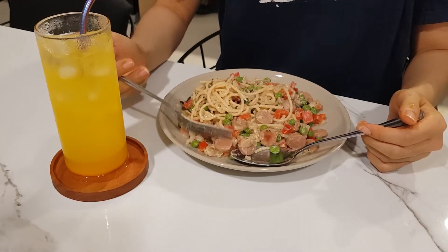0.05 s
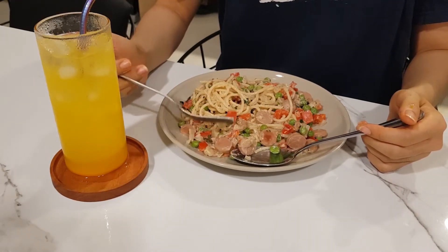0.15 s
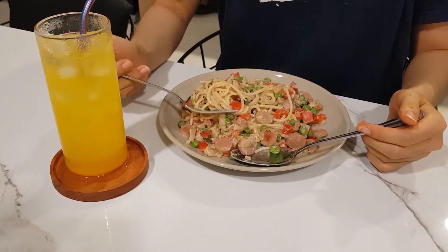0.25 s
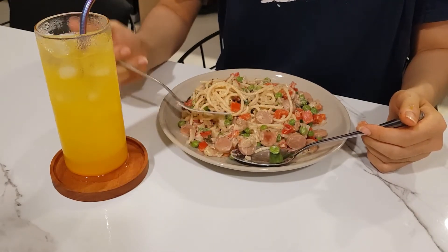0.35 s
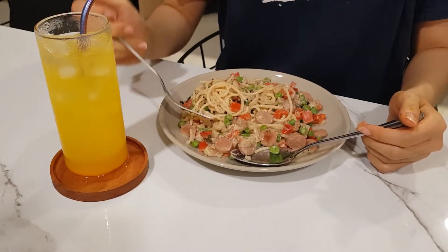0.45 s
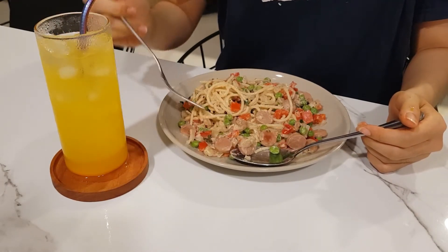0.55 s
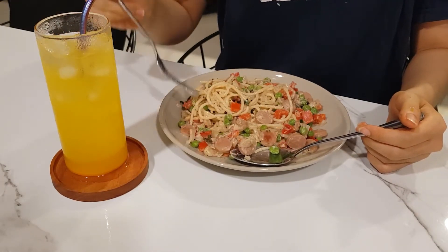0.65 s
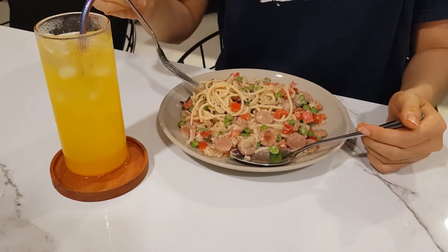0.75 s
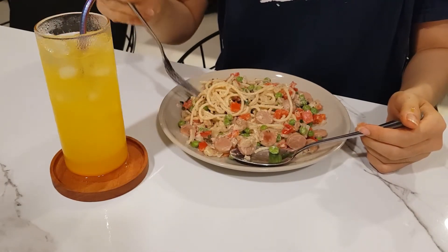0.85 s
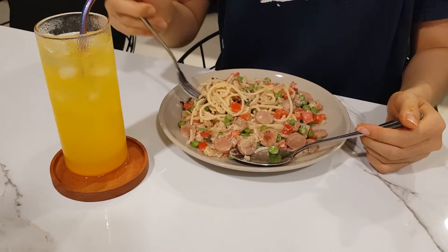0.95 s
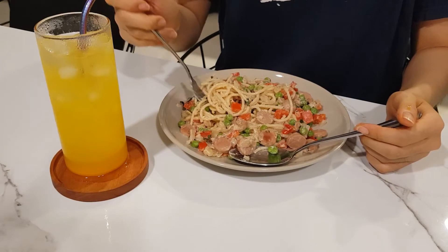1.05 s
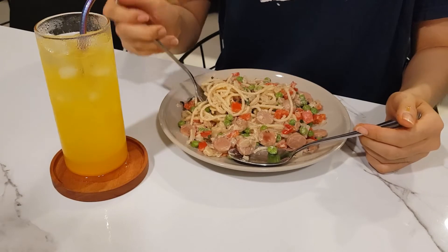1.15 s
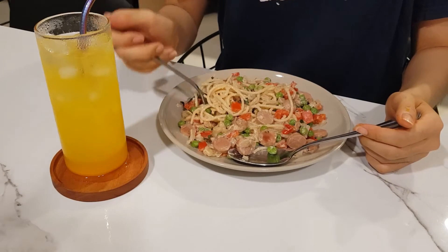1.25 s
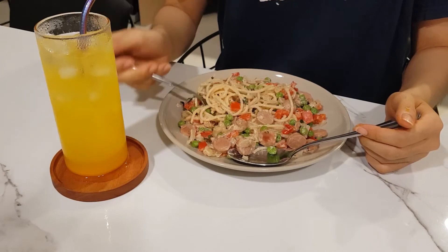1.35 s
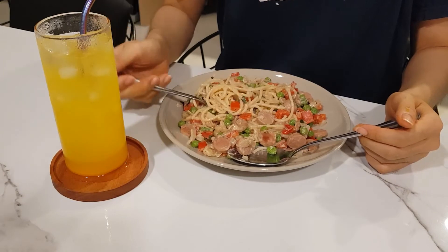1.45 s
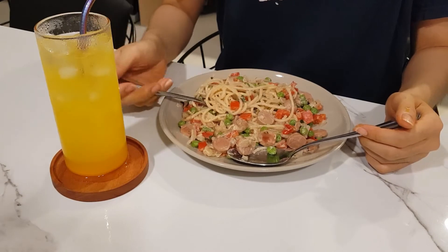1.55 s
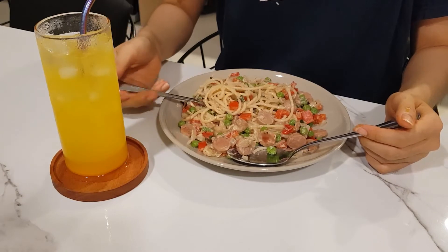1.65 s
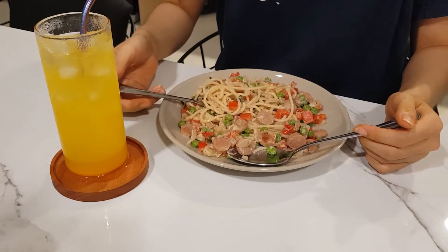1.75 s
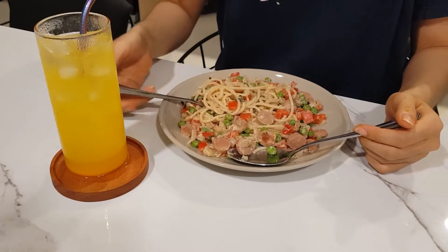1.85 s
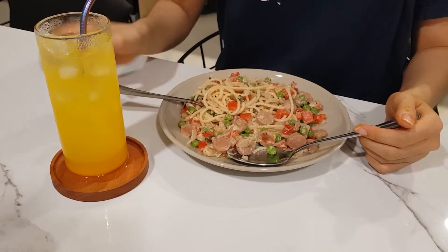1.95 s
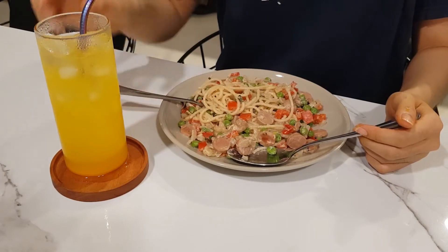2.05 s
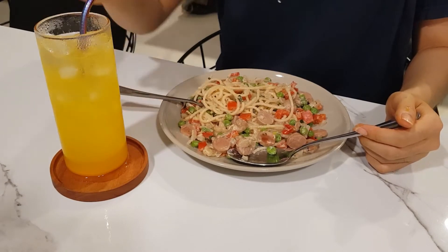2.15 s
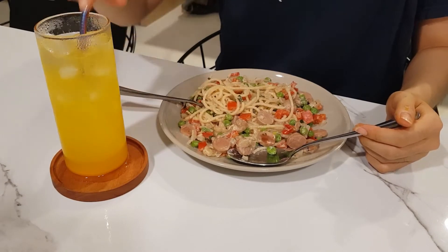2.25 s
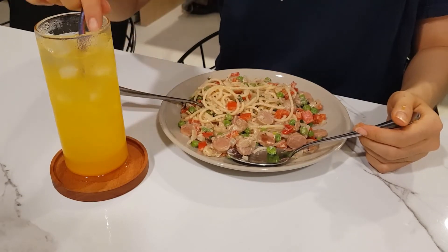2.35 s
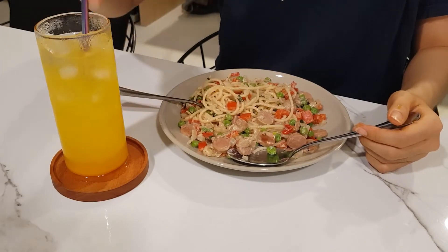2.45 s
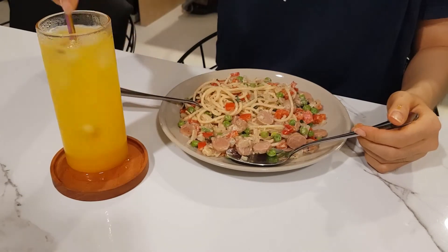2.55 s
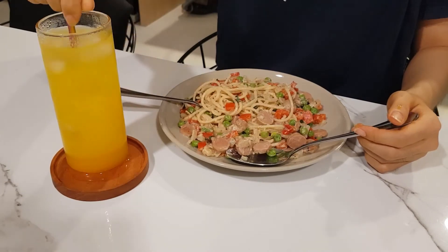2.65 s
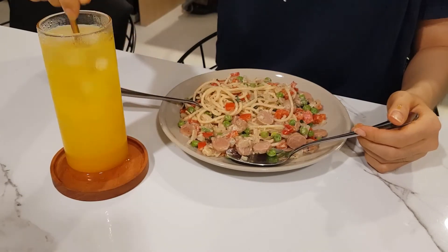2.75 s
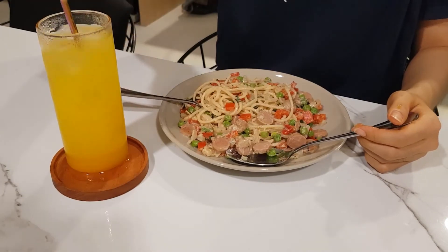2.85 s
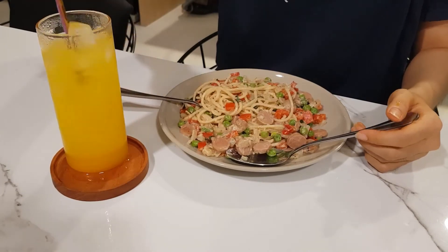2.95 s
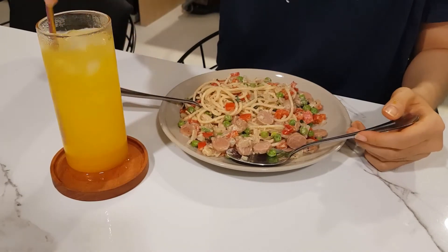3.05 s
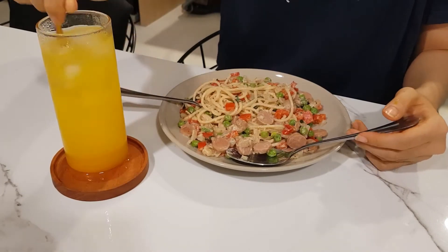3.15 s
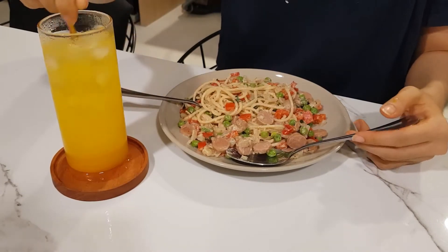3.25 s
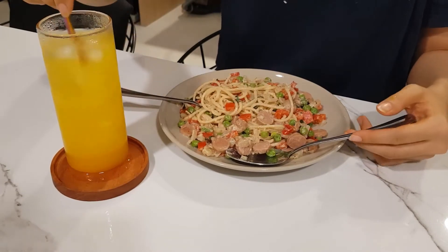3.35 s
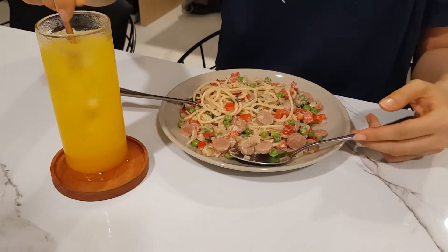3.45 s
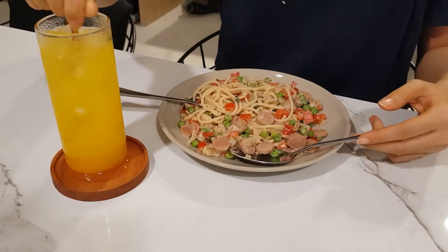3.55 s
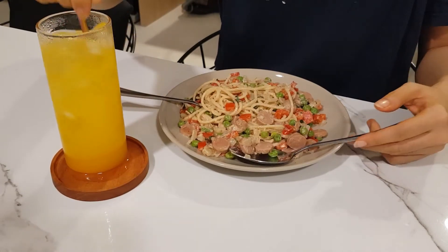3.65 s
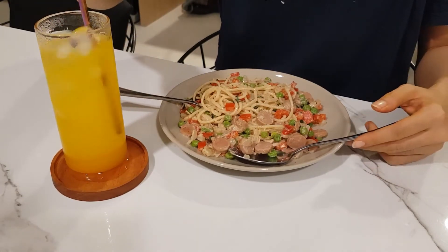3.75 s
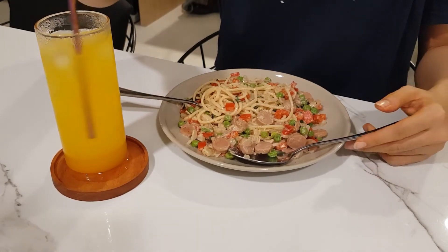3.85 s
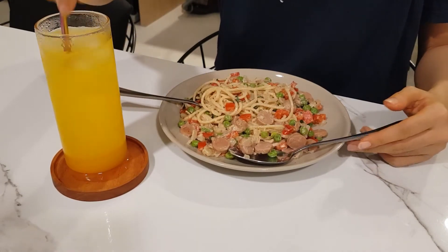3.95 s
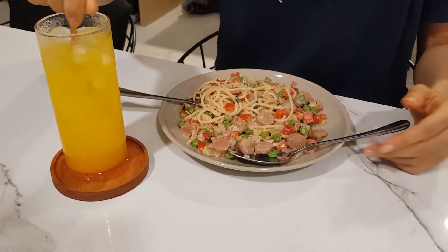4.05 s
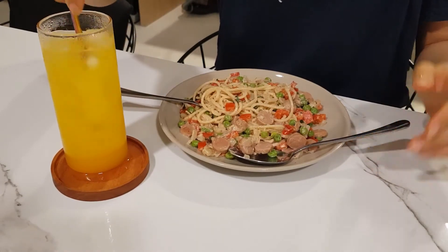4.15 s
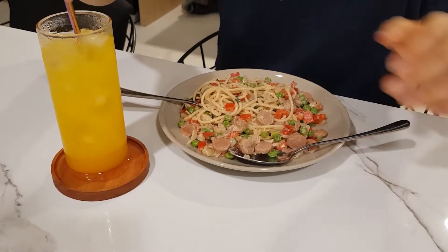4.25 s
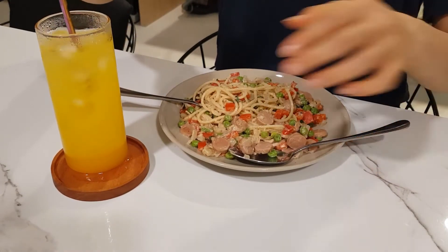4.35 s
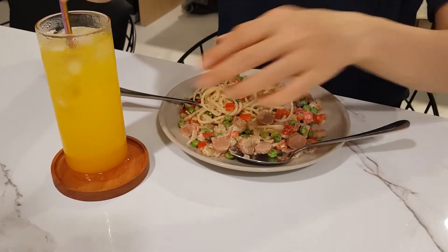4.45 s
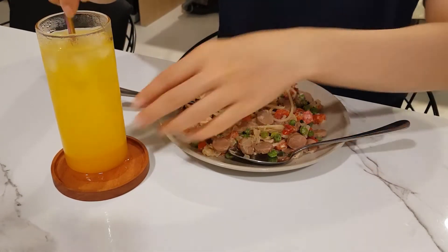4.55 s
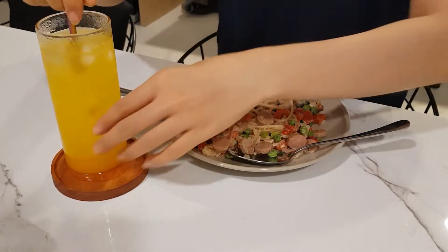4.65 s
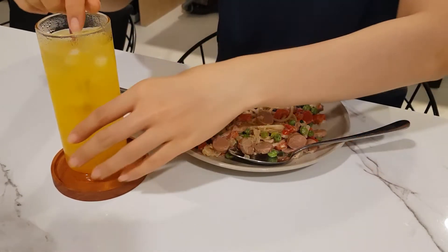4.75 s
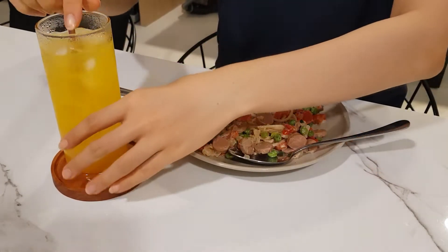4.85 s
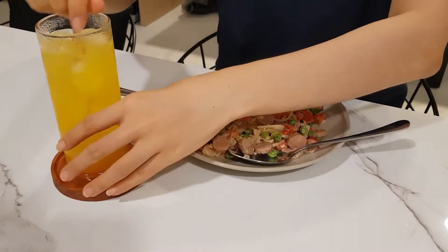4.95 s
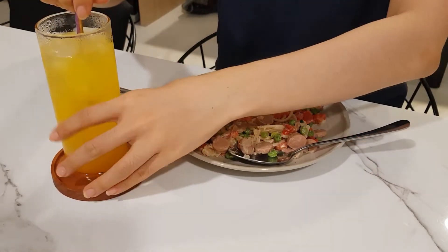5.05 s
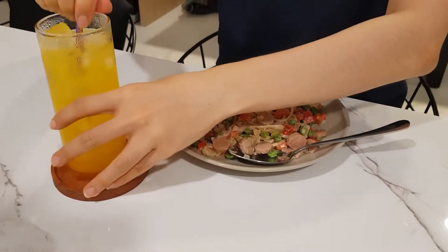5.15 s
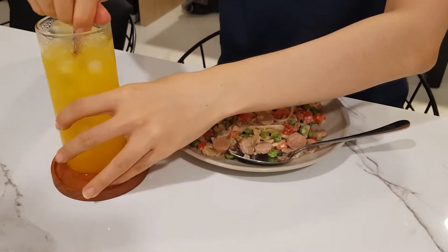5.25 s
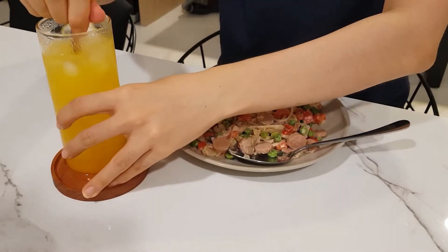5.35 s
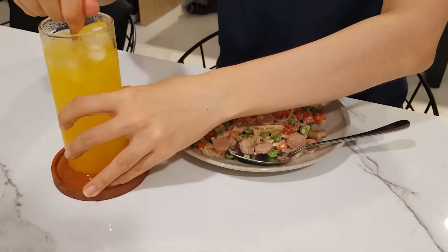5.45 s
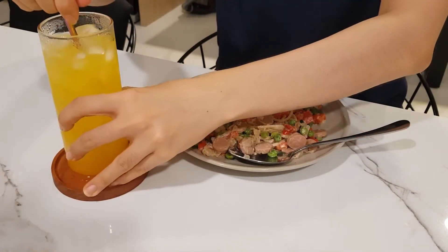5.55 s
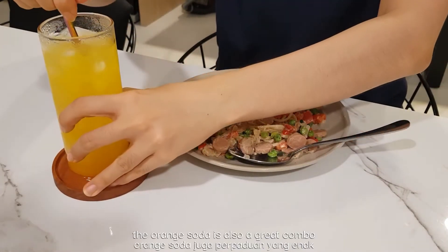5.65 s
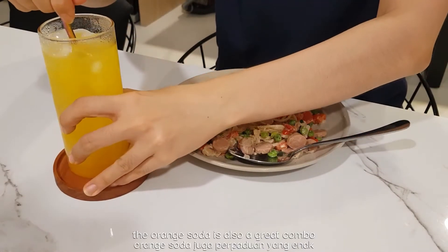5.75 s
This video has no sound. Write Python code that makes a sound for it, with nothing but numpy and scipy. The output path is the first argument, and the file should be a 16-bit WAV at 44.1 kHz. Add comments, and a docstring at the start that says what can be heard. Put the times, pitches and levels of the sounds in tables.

```python
"""At a table in a quiet room with a faint high whine, a stereo pair of microphones close to a tall glass.
A fork turns in noodles and touches a plate softly; then a metal straw stirs ice cubes in the glass of soda.
The cubes tick, grind and drag against the wall, whose ring the drink damps. The drink sloshes,
a few bubbles plink, and the straw knocks hard on the glass, which stands a little to the left."""
import sys
import numpy as np
from scipy import signal
from scipy.fft import rfft, irfft
from scipy.io import wavfile
from scipy.ndimage import uniform_filter1d

SR = 44100
rng = np.random.default_rng(int(sys.argv[2]) if len(sys.argv) > 2 else 0)


def wav_record(signal):
    """Record a signal, one row per channel, as 16-bit PCM in the file named by sys.argv[1]."""
    frames = np.transpose(np.atleast_2d(signal))
    bounded = np.clip(frames, -1, 1)
    # unit amplitude maps onto the largest positive 16-bit level
    quanta = np.round(bounded * 32767).astype(np.int16)
    wavfile.write(sys.argv[1], SR, quanta)


N = 255339


def amp(db):
    """Decibels to gain."""
    return 10 ** (np.asarray(db) / 20)


def unit_rms(x):
    """Scales to rms 1."""
    return x / np.sqrt(np.mean(x ** 2) + 1e-20)


def curve_at(points, hz):
    """Joins (Hz, value) points on a log-frequency axis."""
    f, value = np.transpose(points)
    return np.interp(np.log(hz + 1), np.log(f + 1), value)


def add(mix, s, sound):
    """Mixes a stereo sound in at time s."""
    part = mix[:, round(s * SR):][:, :sound.shape[1]]
    part += sound[:, :part.shape[1]]


def colour(x, spectrum, size=2048):
    """Minimum-phase filter of unit energy with the given spectrum."""
    hz = abs(np.fft.fftfreq(size, 1 / SR))
    log_gain = np.log(amp(curve_at(spectrum, hz)))
    impulse = np.fft.ifft(np.exp(np.conj(signal.hilbert(log_gain)))).real
    return signal.fftconvolve(x, impulse[None] / np.linalg.norm(impulse), axes=1)[:, :x.shape[1]]


def burst(decay_s, rise_s, size=2048, lag_samples=4):
    """A contact that chatters briefly; it reaches the left microphone first."""
    t = np.arange(size) / SR
    shared, *own = rng.standard_normal((3, size))
    chatter = np.array([shared, np.roll(shared, lag_samples)]) + np.array(own)
    contact = chatter * np.exp(-t / decay_s) * (1 - np.exp(-t / rise_s))
    return contact * np.sqrt(2) / np.linalg.norm(contact)


def ring(modes, rise_s, scatter_db, detune, stretch=1, lead_s=.00007, size=8000):
    """One blow on a set of modes; the contact point and the moving drink shift strength and pitch."""
    hz, db, t60 = np.transpose(modes)[:, :, None]
    strength, pitch, phase, side = rng.standard_normal((4, len(modes), 1))
    t = np.arange(size) / SR
    fade = amp(db + scatter_db * strength - 60 * t / t60)
    shifted_hz = hz * stretch * (1 + detune * pitch)
    right = fade * np.exp(2j * np.pi * (shifted_hz * t + phase))
    left = right * np.exp(1j * (.5 * side + 2 * np.pi * hz * lead_s))
    return np.array([left.sum(0).real, right.sum(0).real]) * (1 - np.exp(-t / rise_s))


# how alike the two microphones hear a noise: f/Hz, coherence/0-1
MIC_COHERENCE = [(50, 0.78), (150, 0.91), (300, 0.84), (700, 0.27), (2000, 0), (8000, 0)]
def noise(spectrum):
    """Steady noise of rms 1, nearly the same at both microphones in the bass."""
    hz = np.fft.rfftfreq(N, 1 / SR)
    left, unrelated = rfft(rng.standard_normal((2, N)))
    same = np.clip(curve_at(MIC_COHERENCE, hz), 0, 1)
    right = same * left + np.sqrt(1 - same ** 2) * unrelated
    return unit_rms(irfft(np.array([left, right]) * amp(curve_at(spectrum, hz)), N))


# still air all round the microphones: f/Hz, level/dB
AIR_SPECTRUM = [(20, -25), (30, -18), (40, 6), (55, -1.5), (80, 2), (250, 2), (350, -7), (780, -11.5),
                (1000, -28.5), (2600, -16.5), (3600, -24), (8000, -31.5), (12500, -22.5), (16000, -22.5)]
# the whine in the background: f/Hz, level/dB
WHINE_SPECTRUM = [(1700, -26), (1960, -22), (2090, 1), (2150, -7.5), (2215, 4), (2300, -5.5), (2400, -13),
                  (2700, -44)]
def room_tone():
    """A low hush, and a narrow band of noise that whines just above 2 kHz."""
    return amp(-68) * noise(AIR_SPECTRUM) + amp(-63) * noise(WHINE_SPECTRUM)


# turns of the fork, on the plate: t/s, length/s, level/dB
FORK_TURNS = [(0.0, 0.035, -72), (0.185, 0.18, -75.5), (0.653, 0.13, -80), (0.884, 0.11, -78),
              (1.134, 0.14, -73.5), (1.4, 0.12, -77.5), (2.126, 0.13, -74), (2.312, .36, -78)]
# a soft, dull contact at the table: f/Hz, level/dB
THUD_SPECTRUM = [(60, -10.5), (250, -0.5), (700, 1), (1400, 5), (3000, -3.5), (8000, -26), (16000, -13)]
def noodles(lumpy_db=3.5, lump_samples=700):
    """The noodles rustle in one lumpy arch for each turn of the fork."""
    t = np.arange(N) / SR
    turns = sum(amp(db) * np.sin(np.pi * np.clip((t - s) / length_s, 0, 1))
                for s, length_s, db in FORK_TURNS)
    wander = unit_rms(uniform_filter1d(rng.standard_normal(N), lump_samples))
    return turns * unit_rms(amp(lumpy_db * wander)) * noise(THUD_SPECTRUM)


# the fork on the plate, then fingers at the straw: t/s, level/dB
TOUCHES = [(0.446, -59), (0.924, -72), (1.202, -70), (1.472, -65), (1.54, -75), (2.263, -59.5),
           (2.598, -57), (2.642, -60)]
# the crack of a hard contact, as of ice on glass, close by: f/Hz, level/dB
CRACK_SPECTRUM = [(100, -25), (1200, -16.5), (1900, -3.5), (3000, 1), (3600, -2.5), (4800, 4), (6500, 0.5),
                  (7600, -6.5), (9000, -2.5), (16000, -32.5)]
def taps():
    """Soft touches with no ring: a thud with a little bite."""
    out = np.zeros((2, N))
    for s, db in TOUCHES:
        touch = burst(decay_s=0.0059, rise_s=0.00052)
        add(out, s, amp(db + 20.5) * colour(touch, THUD_SPECTRUM))
        add(out, s, amp(db + 4) * colour(touch, CRACK_SPECTRUM))
    return out


# the fork, later the hand taking hold of the glass: t/s, level/dB
SCRATCH_EVENTS = [(1.107, -54.5), (1.151, -57), (1.161, -56), (4.886, -46), (4.907, -41), (4.929, -45)]
# their thin treble: f/Hz, level/dB
SCRATCH_SPECTRUM = [(100, -18), (6500, -2), (8500, 5), (9500, 14), (11000, 0), (13000, 12), (15000, -14),
                    (16000, 10)]
def scratches():
    """Tiny bright scratches, each one very short contact."""
    out = np.zeros((2, N))
    for s, db in SCRATCH_EVENTS:
        add(out, s, amp(db + 9.5) * colour(burst(decay_s=0.0013, rise_s=0.00083), SCRATCH_SPECTRUM))
    return out


# how hard the straw drives the cubes round: t/s, level/dB, top against that level/dB
STIRRING = [(2.581, -67, 4.5), (2.66, -64.5, -14), (2.82, -63, -3.5), (2.92, -51, 0), (3.18, -47.5, -5),
            (3.37, -44, -1), (3.46, -54, -1.5), (3.54, -46.5, 1), (3.88, -51.5, -5), (4.08, -55, -7),
            (4.17, -43.5, -1.5), (4.33, -57.5, -11), (4.68, -58, -6), (5.019, -73.5, -1.5),
            (5.17, -51.5, -2.5), (5.39, -46.5, -4), (5.49, -53, -2), (5.79, -55.5, -1.5)]
# modes of the full glass, close by: f/Hz, level/dB, t60/s
GLASS_MODES = [(269, -46, 0.34), (814, -9.5, 0.028), (2228, -8.5, 0.062), (2361.5, 1.5, 0.081),
               (2439, 2, 0.035), (2922, -10, 0.049), (4555, -4, 0.039), (4866, -0.5, 0.038),
               (6630, -18, .03), (7540, -1.5, 0.025)]
# the top of the crack, with the resonances of cubes and straw: f/Hz, level/dB
TOP_SPECTRUM = [(100, -112), (6500, -24.5), (8400, -2), (8900, -3), (10200, 1.5), (10650, -1), (11100, -4),
                (11450, -2), (12100, -2.5), (13600, -11.5), (14400, -7.5), (16000, -22.5)]
def grinding(slips_per_s=260, spread_db=2.5, grain_count=12):
    """Many tiny slips between the cubes ring the glass as the straw goes round."""
    stir_s, stir_db, top_db = np.transpose(STIRRING)
    t = np.arange(N) / SR
    body, top = np.zeros((2, 2, N))
    for _ in range(grain_count):
        slipping = rng.random(N) < slips_per_s / grain_count / SR
        slips = slipping * amp(spread_db * np.minimum(rng.exponential(1, N), 2))
        contact = burst(decay_s=0.0011, rise_s=0.00066)
        grain = amp(-26) * ring(GLASS_MODES, rise_s=0.00043, scatter_db=1.5, detune=.018)
        add(grain, 0, colour(contact, CRACK_SPECTRUM))
        body += signal.oaconvolve(slips[None], grain, axes=1)[:, :N]
        top += signal.oaconvolve(slips[None], colour(contact, TOP_SPECTRUM), axes=1)[:, :N]
    effort = amp(np.interp(t, stir_s, stir_db, left=-120))
    top_gain = amp(np.interp(t, stir_s, top_db) - 7.5)
    return effort * (amp(-3) * unit_rms(body) + top_gain * unit_rms(top))


def tick(db, ring_db, top_db, hz, rest_hz=2370):
    """One cube cracks against the wall and rings the glass."""
    contact = burst(decay_s=0.0013, rise_s=0.00076)
    glass = ring(GLASS_MODES, rise_s=0.0012, scatter_db=3, detune=0.0053, stretch=hz / rest_hz)
    out = amp(db + ring_db) * glass
    add(out, 0, amp(db + 11) * colour(contact, CRACK_SPECTRUM))
    add(out, 0, amp(db + top_db + 19.5) * colour(contact, TOP_SPECTRUM))
    return out


# the clearest blows of ice, close by: t/s, level/dB, ring/dB and top/dB against that level
ICE_BLOWS = [(2.6189, -39.5, -9, -9.5), (2.8, -39, -12, -26), (2.8863, -38.5, -6.5, -17),
             (2.8963, -27.5, -11, -17), (2.9183, -31.5, -18, -13), (2.9264, -26.5, -20, -10.5),
             (2.9582, -29.5, -32, -18), (3.022, -33.5, -11, -9), (3.1053, -25, -14, -21),
             (3.1418, -29, -33, -14), (3.2066, -22.5, -18, -1), (3.2645, -28, -24, 0),
             (3.2774, -34.5, -15, -2), (3.3804, -35.5, -4.5, -25), (3.483, -31, -15.5, -21),
             (3.5129, -34, -38, -5), (3.5214, -25.5, -21, -19), (3.5438, -21.5, -12, -11.5),
             (3.7165, -24, -14, -4.5), (3.7519, -26, -29, -10), (3.7803, -25, -11, -7.5),
             (4.1006, -31, -5, -16), (4.1425, -22, -15, -15), (4.1709, -27.5, -10, -11),
             (4.1919, -25.5, -7, -14), (4.2094, -25, -19.5, -8.5), (4.2354, -32, -22, -15),
             (4.2837, -31, -30, -18), (4.3765, -37.5, -7, -30), (4.4004, -21.5, -36, -14.5),
             (4.4189, -22, -37, -14), (4.4503, -33.5, -5.5, -16), (4.577, -34.5, -9.5, -16.5),
             (4.7052, -38.5, -7.5, -17), (4.8638, -55.5, 2.5, -26), (5.0419, -48, -2, -13),
             (5.1274, -40, -18, -5.5), (5.1372, -29, -18, -24), (5.2255, -32, -9.5, -17),
             (5.2375, -30, -33, -17), (5.2515, -32, -7.5, -6.5), (5.2724, -26.5, -24, -18),
             (5.3358, -25.5, -15.5, -15.5), (5.3592, -26.5, -8.5, -14), (5.3822, -29, -12, -12),
             (5.4201, -29.5, -15, -22), (5.4525, -34.5, -8, -19), (5.4954, -27, -25, -21),
             (5.5328, -27.5, -20, -19), (5.5378, -28, -24, -18), (5.5982, -33, -19, -13.5),
             (5.7254, -30, -15.5, -14)]
# the glass's main note, drifting as the drink swirls, a little higher once the hand holds it: t/s, f/Hz
GLASS_NOTE = [(2.9, 2358), (3.75, 2400), (4.2, 2347), (4.85, 2362), (5.13, 2402), (5.79, 2400)]
def ice(swirl=0.0063, spread_db=3, light_ring_db=-10, light_top_db=-13, light_count=50):
    """Clear blows, and light random ones that grow with the stirring; the swirl shifts their pitch."""
    out = np.zeros((2, N))
    stir_s, stir_db, _ = np.transpose(STIRRING)
    progress = (np.arange(light_count) + rng.random(light_count)) / light_count
    light_s = stir_s[0] + (stir_s[-1] - stir_s[0]) * progress
    light_db = np.interp(light_s, stir_s, stir_db) + 11 + spread_db * rng.uniform(-0.82, 1, light_count)
    light_blows = [(s, db, light_ring_db, light_top_db) for s, db in zip(light_s, light_db)]
    for s, db, ring_db, top_db in light_blows + ICE_BLOWS:
        hz = np.interp(s, *np.transpose(GLASS_NOTE)) * (1 + swirl * rng.standard_normal())
        add(out, s, tick(db, ring_db, top_db, hz))
    return out


# surges of the drink, rocking the glass on its coaster: t/s, level/dB, length/s
SURGES = [(2.668, -58, 0.023), (2.85, -66, 0.13), (3.11, -56.5, 0.041), (3.38, -64, 0.082),
          (3.517, -48.5, 0.051), (3.588, -56.5, 0.021), (3.826, -52, 0.073), (4.447, -59, 0.029),
          (4.892, -66, 0.054), (5.132, -60, 0.071), (5.38, -61.5, 0.077), (5.545, -66.5, 0.16)]
# their low heave at the microphones: f/Hz, level/dB
HEAVE_SPECTRUM = [(30, -37), (80, -3), (125, 6.5), (170, -1), (250, 7.5), (400, -6.5), (600, -11),
                  (1200, -18), (4000, -46)]
def slosh(rise_s=0.021, fade_s=0.065):
    """Low, lumpy heaving of the drink: each surge swells, holds and dies away."""
    t, power = np.arange(N) / SR, np.zeros(N)
    for s, db, length_s in SURGES:
        swell = np.clip((t - s) / rise_s, 0, 1)
        fade = np.exp(-np.maximum(t - s - length_s, 0) / fade_s)
        power += (amp(db) * swell * fade) ** 2
    return np.sqrt(power) * noise(HEAVE_SPECTRUM)


# a cube dragging on the wall of the glass: t/s, length/s, level/dB
DRAGS = [(2.908, 0.024, -52), (3.375, 0.015, -52), (3.676, 0.044, -48), (3.746, 0.043, -45),
         (4.095, 0.016, -44), (4.148, 0.033, -46), (4.191, 0.031, -41.5), (4.225, 0.016, -47),
         (5.137, 0.012, -36), (5.253, 0.017, -45), (5.355, 0.032, -40.5)]
def singing(waver=0.013, rough=0.41, octave_db=-15, lead_s=.00007, smooth_samples=130):
    """Stick and slip locks on to the glass's main mode: a short, rough, wavering note."""
    out = np.zeros((2, N))
    pitch, grip = unit_rms(uniform_filter1d(rng.standard_normal((2, N)), smooth_samples, axis=1))
    mic_lead_s = np.array([[lead_s], [0]])
    for s, length_s, db in DRAGS:
        span = round(s * SR) + np.arange(round(length_s * SR))
        hz = np.interp(s, *np.transpose(GLASS_NOTE))
        phase = 2 * np.pi * hz * (np.cumsum(1 + waver * pitch[span]) / SR + mic_lead_s)
        note = (np.sin(phase) + amp(octave_db) * np.sin(2 * phase)) * np.exp(rough * grip[span])
        add(out, s, amp(db) * unit_rms(note * signal.windows.tukey(len(span), .5)))
    return out


# bubbles in the drink, reaching both microphones together: t/s, f/Hz, level/dB
BUBBLE_PLINKS = [(2.959, 4550, -30), (3.945, 2610, -44), (3.994, 2790, -36.5), (4.678, 2880, -42),
                 (5.17, 3440, -45), (5.453, 3010, -28)]
def bubbles(t60=0.012, rise_s=0.0011, glide=1.5):
    """A bubble rings briefly and rises in pitch as it nears the surface."""
    out, t = np.zeros((2, N)), np.arange(2500) / SR
    for s, hz, db in BUBBLE_PLINKS:
        envelope = amp(db + 0.5 - 60 * t / t60) * (1 - np.exp(-t / rise_s))
        plink = envelope * np.sin(2 * np.pi * hz * t * (1 + glide * t))
        add(out, s, np.array([plink, plink]))
    return out


# the straw knocking on the glass, close by: t/s, level/dB, contact time/s
STRAW_KNOCKS = [(3.522, -45, .001), (3.5439, -39.5, 0.00081), (3.815, -16, .001), (3.8332, -19.5, 0.0035)]
# modes of the metal straw against the glass: f/Hz, level/dB, t60/s
STRAW_MODES = [(464.5, -11.5, 0.072), (753, -9.5, 0.036), (830, -1, 0.02), (1236, -18.5, 0.14),
               (1684, -0.5, 0.018), (1813, 3.5, 0.036), (3050, 0, 0.023), (3384, -8.5, 0.057),
               (4130, 12.5, 0.01), (4215, 13.5, 0.013), (5040, 5, 0.017), (5850, 1, 0.044),
               (6430, -9, 0.05), (9850, 6, 0.018), (10700, -13, 0.095), (12000, -16, 0.081),
               (15200, -10, 0.033)]
def straw():
    """The straw slips off a cube, hits the glass and bounces; the blow thuds through the coaster."""
    out = np.zeros((2, N))
    for s, db, contact_s in STRAW_KNOCKS:
        metal = ring(STRAW_MODES, rise_s=0.00069, scatter_db=-1, detune=0.0032, lead_s=.00004)
        add(out, s, amp(db - 10.5) * metal)
        add(out, s, amp(db + 11) * colour(burst(contact_s, rise_s=0.00037), CRACK_SPECTRUM))
        add(out, s, amp(db + 9.5) * colour(burst(contact_s, rise_s=0.00053), TOP_SPECTRUM))
        add(out, s, amp(db + 6) * colour(burst(decay_s=0.025, rise_s=0.0009), THUD_SPECTRUM))
    return out


# how long the room rings, heard from the table: f/Hz, t60/s
ECHO_DECAY = [(150, 0.6), (700, .5), (2000, 0.86), (5000, 0.37), (10000, 0.52), (16000, 0.5)]
# the colour of that echo as it starts: f/Hz, level/dB
ECHO_SPECTRUM = [(150, 4.5), (1000, 4.5), (2400, -1.5), (5000, -0.5), (10000, -0.5), (16000, 4)]
def room_echo(direct, tail_db=-3, early_db=-7, early_s=0.005, echoes_per_s=3000, size=30000):
    """Adds quick reflections off table and plate, then a tail in which each band dies at its own speed."""
    t = np.arange(size) / SR
    sparse = rng.choice([-1., 1.], (2, 2, size)) * (rng.random((2, 2, size)) < echoes_per_s / SR)
    early = sparse[0] * np.exp(-t / early_s) * (t > .001)
    hz, frame_s, bands = signal.stft(sparse[1] * (t > .007), SR, nperseg=256)
    t60 = curve_at(ECHO_DECAY, hz)[:, None]
    fade = amp(curve_at(ECHO_SPECTRUM, hz)[:, None] - 60 * frame_s / t60)
    tail = signal.istft(bands * fade, SR, nperseg=256)[1][:, :size]
    echo = (amp(tail_db) * unit_rms(tail) + amp(early_db) * unit_rms(early)) / np.sqrt(size)
    return direct + signal.fftconvolve(direct, echo, axes=1)[:, :N]


def scene():
    """Glass and plate, a touch louder in the left microphone, over the room's air and whine."""
    background = room_tone()
    glass = ice() + grinding() + singing() + bubbles() + straw()
    handling = noodles() + taps() + scratches()
    balance = amp([[.4], [-.4]])
    return background + balance * room_echo(glass + handling) + slosh()


def record(dry, edge_hz=16100):
    """The recorder's band limit."""
    lowpass = signal.firwin(255, edge_hz, window=("kaiser", 9), fs=SR)
    return signal.oaconvolve(dry, lowpass[None], "same")


dry = scene()
out = record(dry)
wav_record(out)
```